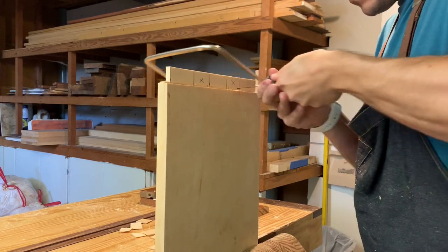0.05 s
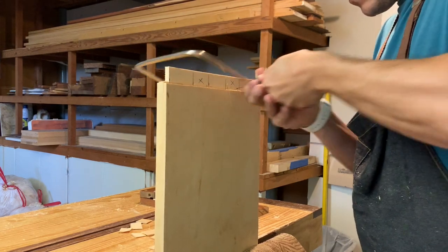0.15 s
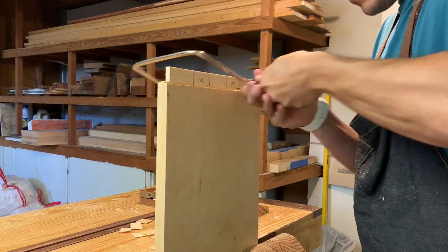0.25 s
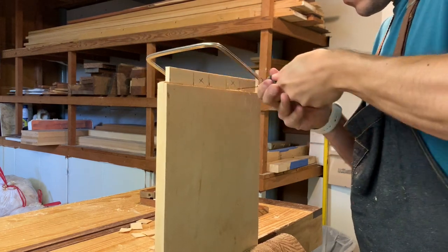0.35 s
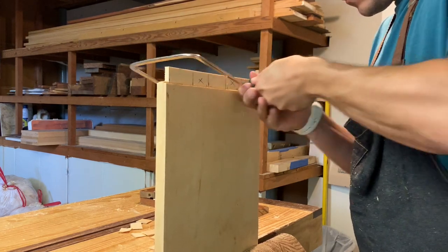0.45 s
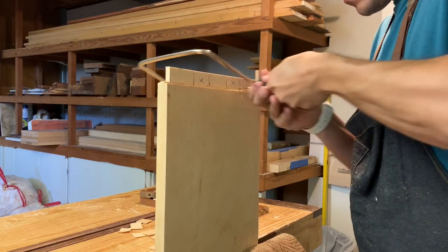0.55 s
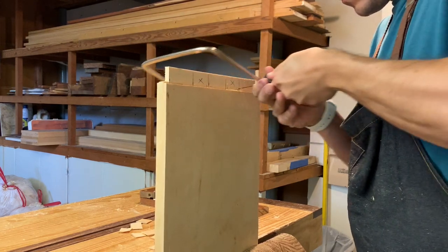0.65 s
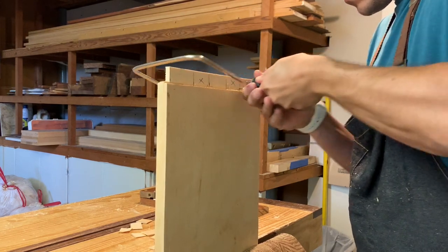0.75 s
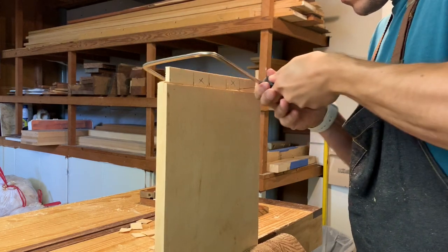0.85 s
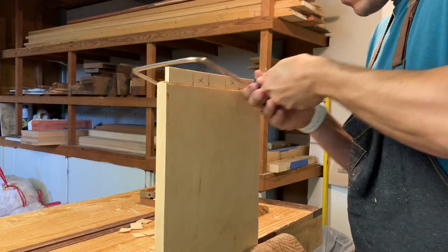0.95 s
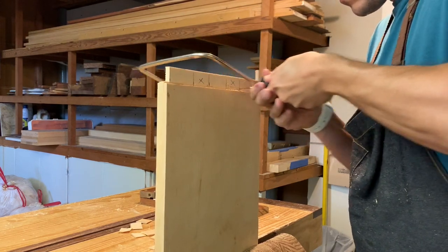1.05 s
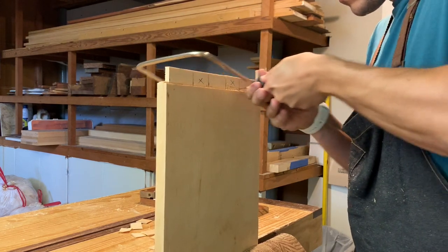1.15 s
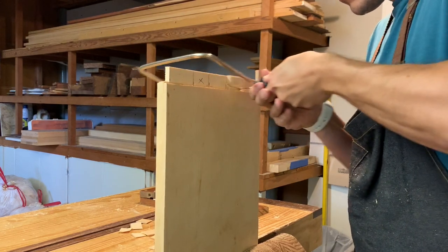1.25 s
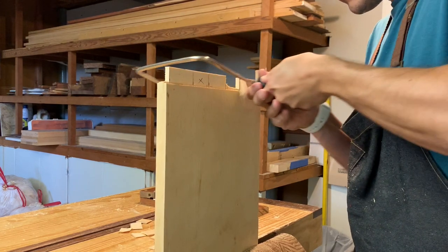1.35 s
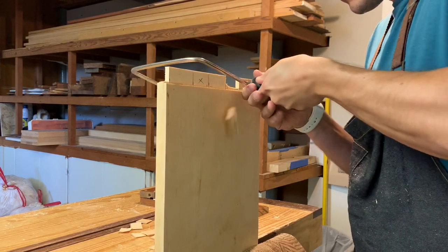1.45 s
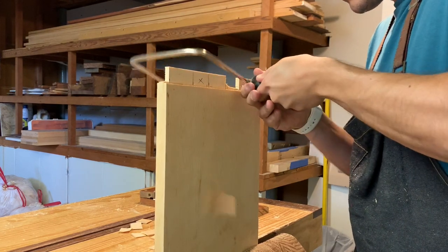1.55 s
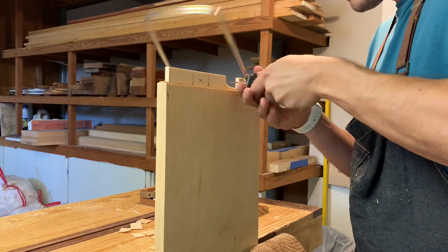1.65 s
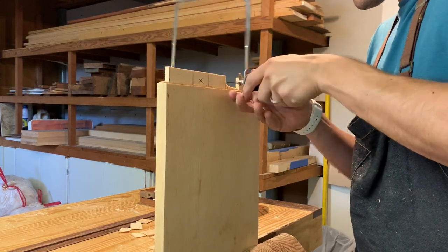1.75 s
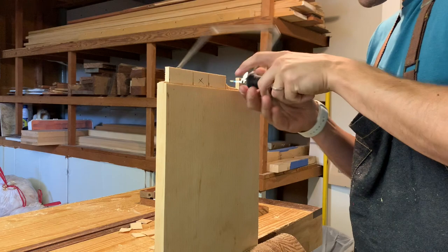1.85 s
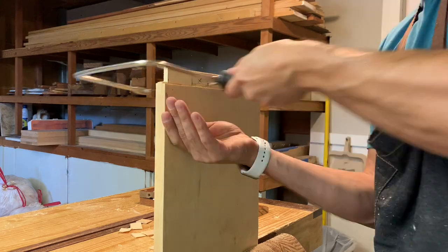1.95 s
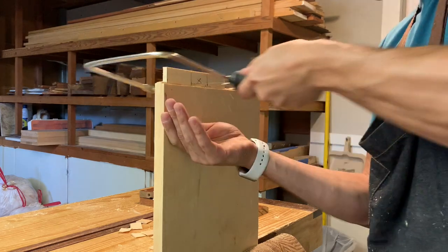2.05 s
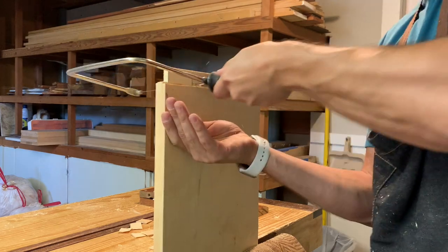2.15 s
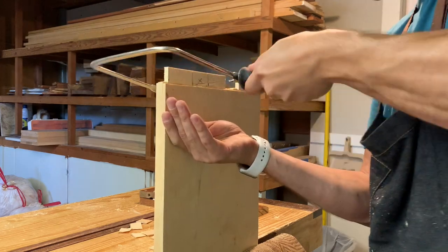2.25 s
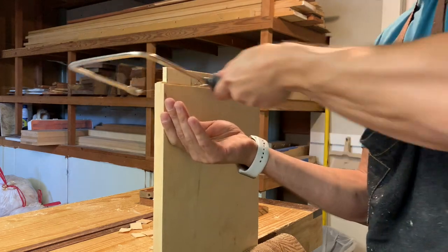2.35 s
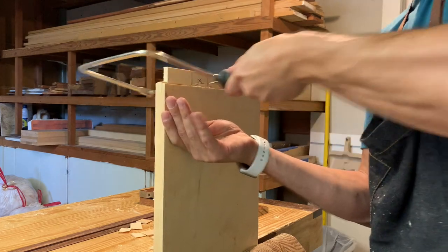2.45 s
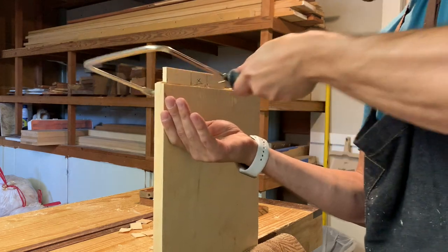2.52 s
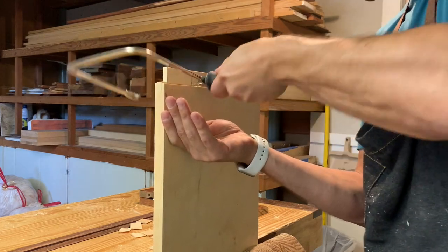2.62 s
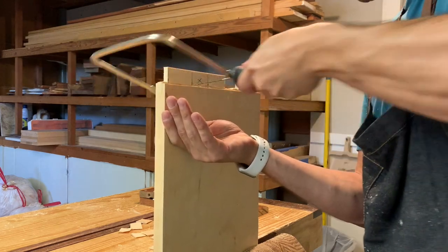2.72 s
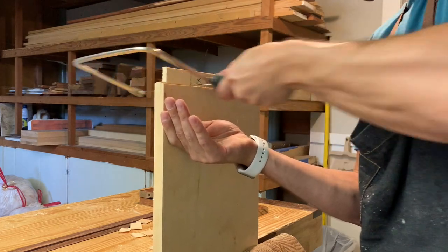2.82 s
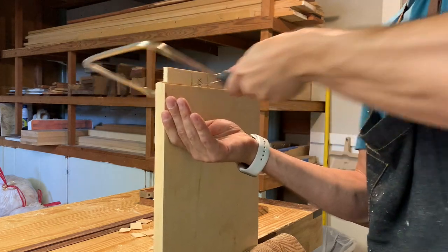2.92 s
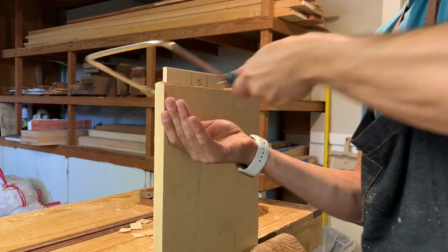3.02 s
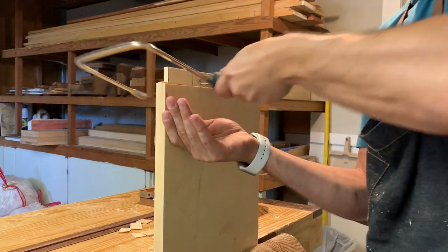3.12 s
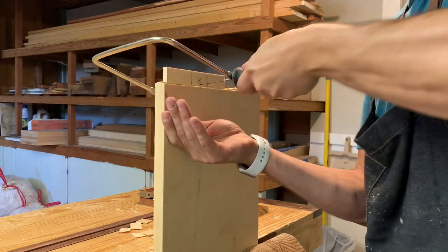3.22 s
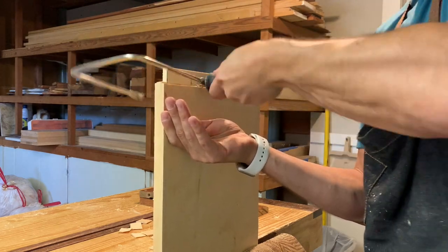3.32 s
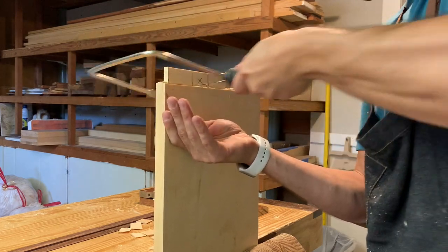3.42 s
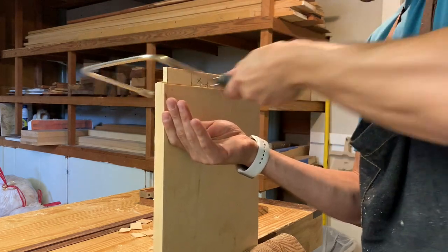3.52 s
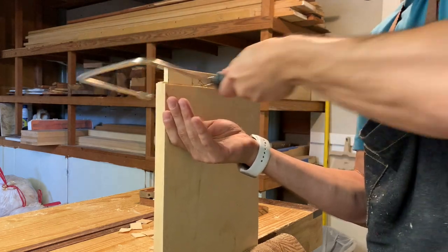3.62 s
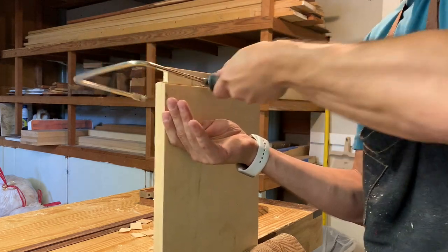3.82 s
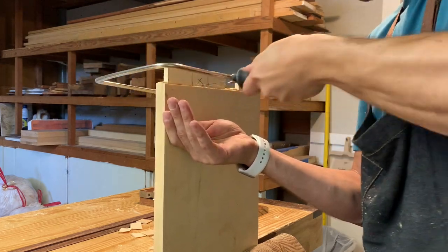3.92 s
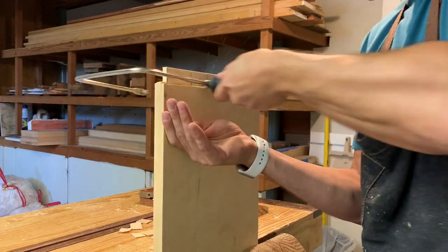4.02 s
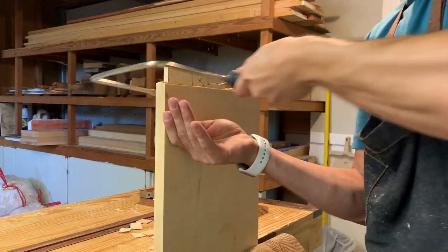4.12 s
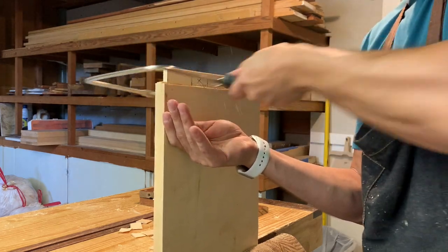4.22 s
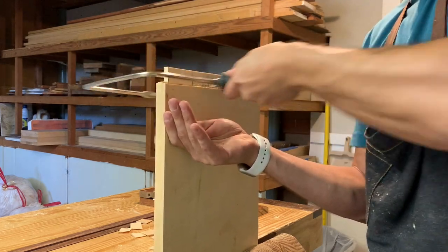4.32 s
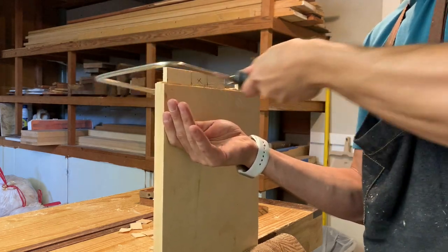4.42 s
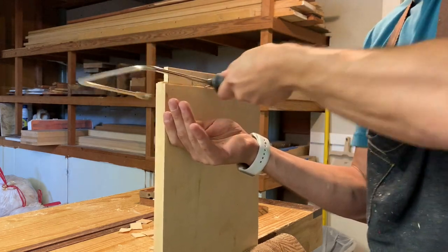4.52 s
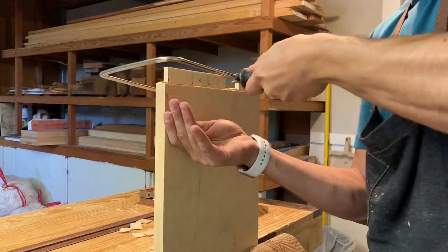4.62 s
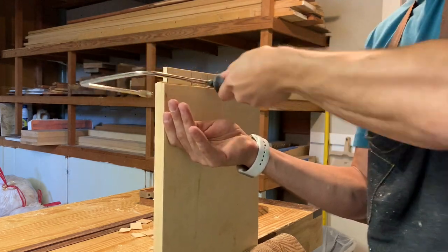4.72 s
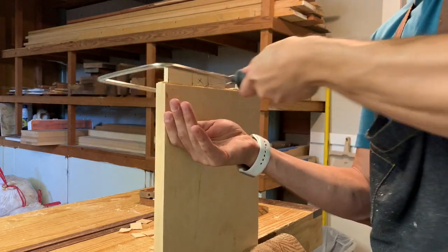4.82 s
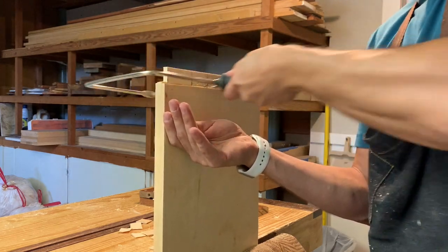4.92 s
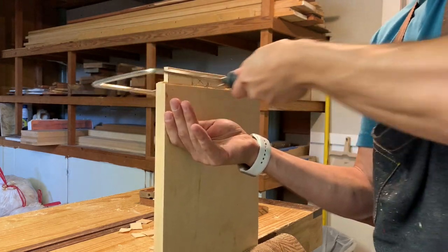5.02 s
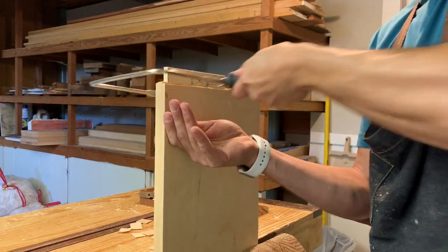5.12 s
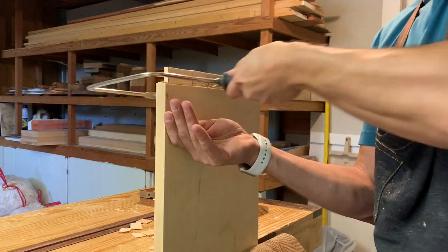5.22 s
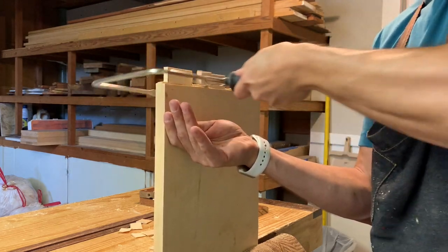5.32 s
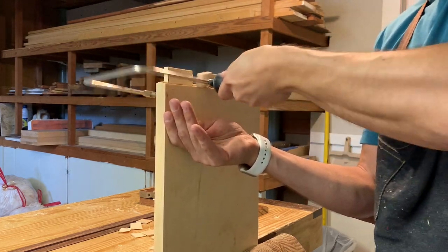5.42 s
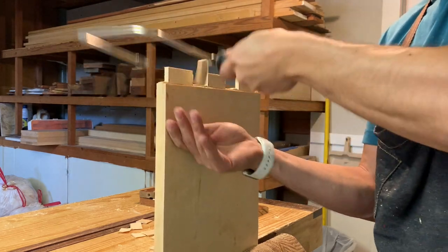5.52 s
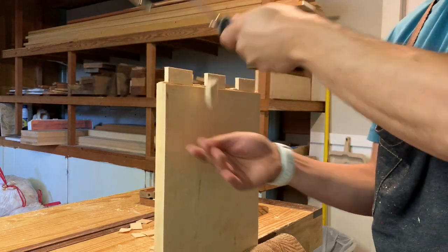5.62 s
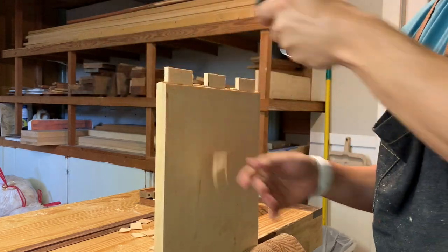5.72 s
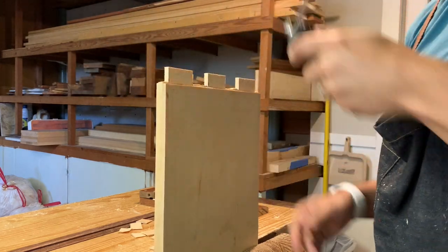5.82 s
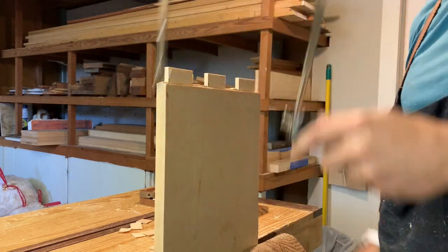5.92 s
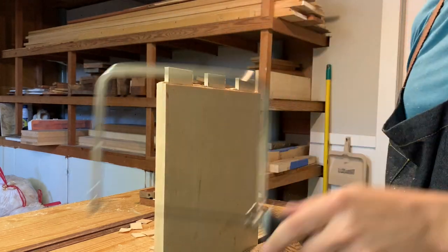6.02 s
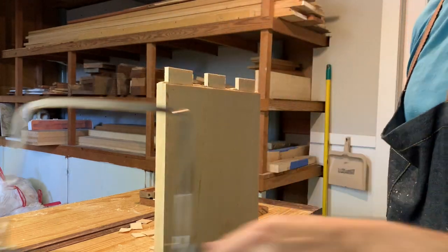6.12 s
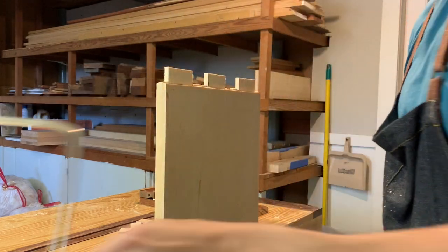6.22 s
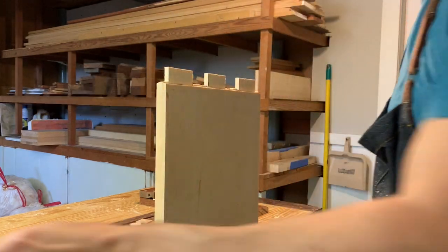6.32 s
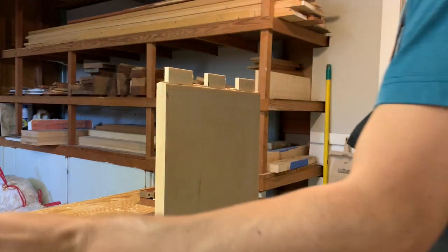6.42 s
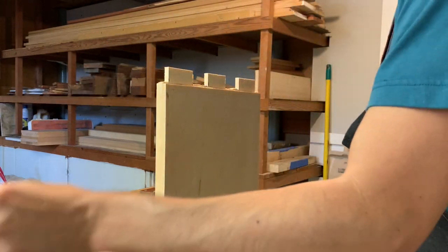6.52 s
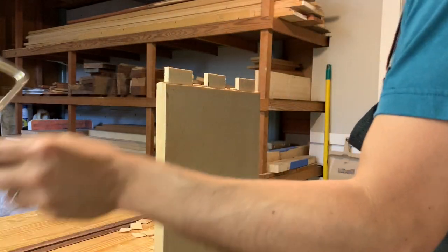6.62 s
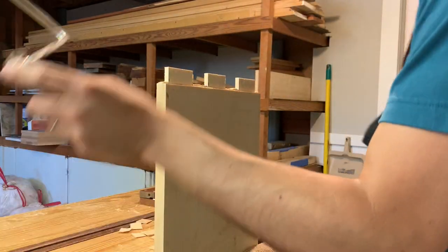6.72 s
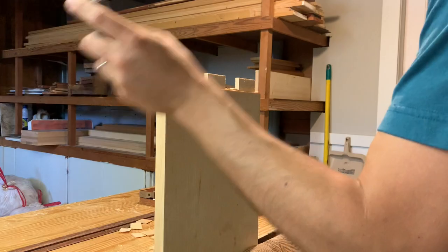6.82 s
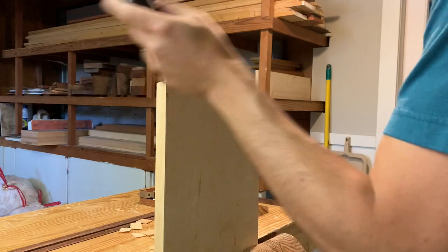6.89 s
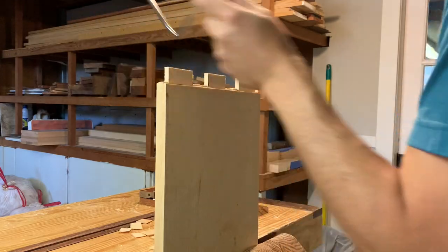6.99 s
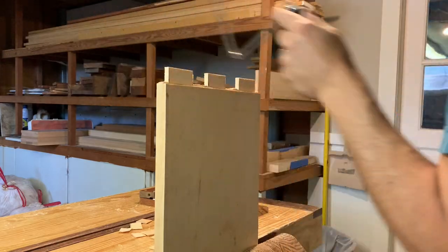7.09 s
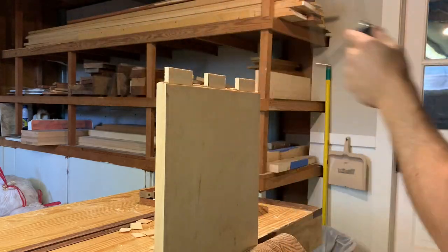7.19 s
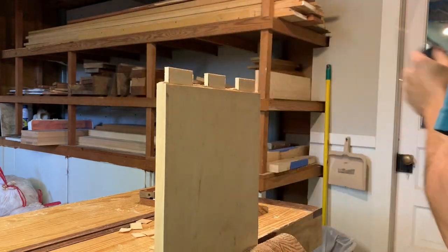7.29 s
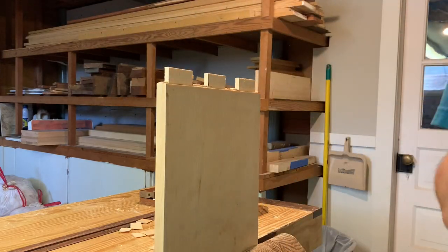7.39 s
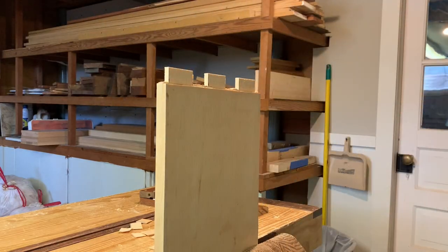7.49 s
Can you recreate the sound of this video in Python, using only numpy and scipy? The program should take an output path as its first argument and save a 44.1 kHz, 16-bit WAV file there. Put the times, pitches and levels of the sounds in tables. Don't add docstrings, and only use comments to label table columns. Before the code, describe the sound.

Close, dry wood sawing in two bursts of fast rasping pushes and lighter returns, ending in an offcut's crack, faint taps and cloth rustle.

```python
import sys
import numpy as np
from scipy import signal
from scipy.fft import rfft, irfft, next_fast_len
from scipy.io import wavfile
from scipy.ndimage import uniform_filter1d

SR = 44100
rng = np.random.default_rng(int(sys.argv[2]) if len(sys.argv) > 2 else 0)


def attenuation_scalar(level_db):
    decades = np.asarray(level_db, float) / 20
    return 10 ** decades


def master(y):
    cut = np.clip(np.atleast_2d(y).T, -1, 1)
    pcm = np.round(cut * 32767)
    wavfile.write(sys.argv[1], SR, pcm.astype(np.int16))


N = 332955
MIDDLE_CUT_S = 1.8


def unit(x):
    return x / np.sqrt(np.mean(np.abs(x) ** 2) + 1e-20)


def along(points, hz):
    f, v = np.transpose(points)
    return np.interp(np.log(hz + 1), np.log(f + 1), v)


def filtered(x, response):
    m = next_fast_len(N + SR // 2)
    spectrum = rfft(x, m) * response(np.fft.rfftfreq(m, 1 / SR))
    return irfft(spectrum, m)[..., :N]


def coloured(x, spectrum):
    return filtered(x, lambda f: unit(attenuation_scalar(along(spectrum, f))))


def ringing(x, modes):
    def response(f):
        total = 0
        for k, (centre, width, db) in enumerate(modes):
            damping = 1j * f * width
            total = total + (-1) ** k * attenuation_scalar(db) * damping / (centre * centre - f * f + damping)
        return unit(total)
    return filtered(x, response)


def board(force, near_corner, near_middle):
    first = np.arange(N) < MIDDLE_CUT_S * SR
    return ringing(force * first, near_corner) + ringing(force * ~first, near_middle)


def crack(t, t60, first_db):
    splinters = attenuation_scalar(-60 * t / t60) * rng.standard_normal(len(t))
    splinters[0] = attenuation_scalar(first_db)
    return splinters


def highpass(x, order, hz):
    return signal.sosfilt(signal.butter(order, hz, 'high', fs=SR, output='sos'), x)


def patchy(x, depth_db):
    z = signal.stft(x, nperseg=512)[2]
    field = uniform_filter1d(rng.standard_normal(z.shape), size=5, axis=0)
    field = uniform_filter1d(field, size=9, axis=1)
    return signal.istft(z * attenuation_scalar(depth_db * unit(field)), nperseg=512)[1][:N]


# start in seconds, push length before the turn in seconds,
# push level in dB, return level in dB, extra weight on the board in dB.
STROKES = [(-0.03, 0.13, -20, -31, -0.5), (0.238, 0.15, -22, -29, -2), (0.5, 0.16, -22.5, -34.5, -1),
           (0.764, 0.17, -22, -38.5, -2), (1.004, 0.11, -25, -34.5, -2.5), (1.217, 0.13, -22.5, -42, -2.5),
           (1.976, 0.057, -22, -28.5, -4.5), (2.146, 0.13, -19.5, -28, 2), (2.404, 0.11, -18, -31.5, -1.5),
           (2.625, 0.13, -19, -28, -0.5), (2.865, 0.12, -18, -28.5, -0.5), (3.103, 0.12, -17, -28.5, 2.5),
           (3.338, 0.13, -18.5, -32, 0), (3.584, 0.12, -20, -32, 0.5), (3.819, .132, -21, -29.5, 0),
           (4.05, 0.13, -20, -29.5, -2.5), (4.285, 0.12, -20, -28.5, -5.5), (4.507, 0.14, -19.5, -29, -3),
           (4.742, 0.1, -20, -29.5, -5), (4.964, 0.11, -23, -32, -1), (5.191, 0.11, -25.5, -35.5, -1.5)]
# push in dB, return in dB.
TEARING = [(3, -6), (-6.5, -6), (-2.5, 0), (-4.5, -3), (-9, -3), (-1.5, -14), (-12, -7), (-3.5, 2),
           (1.5, 11), (12, 7), (3.5, 6), (-0.5, 2), (2.5, 1), (0.5, -0.5), (-3, -2), (-3.5, -2.5), (0, 0.5),
           (1.5, 1), (0.5, -0.5), (-1, -4), (-6, -5.5)]
ENGAGE = [1.2, 1.3, 1.4, 1.1]
RELEASE = [1.1, 1.1, 2.7, 3.2]


def strokes():
    t, out, halves = np.arange(N) / SR, np.zeros((5, N)), []
    next_starts = [row[0] for row in STROKES[1:]] + [N / SR]
    for (s, turn, push_db, return_db, weight_db), (dry_db, back_db), following in zip(STROKES, TEARING, next_starts):
        cut = int(s > MIDDLE_CUT_S)
        push_rasp_db, return_rasp_db = (-22.5, -21.5)[cut], (-22.5, -19)[cut]
        push = np.array([(9.5, 5)[cut] + weight_db, 0, push_rasp_db, push_rasp_db + dry_db])
        back = np.array([(10, 3)[cut], 0, return_rasp_db, return_rasp_db + back_db])
        halves.append((s, 0.39 * turn, turn + 0.022, push_db + push))
        return_s = min(following - s - turn + 0.021, 0.135)
        halves.append((s + turn, (0.027, 0.043)[cut], return_s, return_db + back))
    for start, rise, length, db in halves:
        now = slice(max(round(start * SR), 0), round((start + length) * SR))
        u = t[now] - start
        speed = np.clip(np.sin(np.pi / 2 * np.interp(u, [0, rise, length], [0, 1, 2])), 0, 1)
        power = np.where(u < rise, np.c_[ENGAGE], np.c_[RELEASE])
        out[0, now] = np.maximum(out[0, now], speed)
        out[1:, now] += attenuation_scalar(db)[:, None] * speed ** power
    return out


# time in seconds, freedom in dB.
KERF = [
    [(0, 0), (.25, 3), (.9, -1.5), (1.22, -1.5), (1.5, 3.5)],
    [(1.95, 2.5), (2.2, 2.5), (2.6, -2.5), (3.16, -1.5), (3.7, 0.5), (4.11, 1), (4.57, 0.3), (5.03, 0.5),
     (5.45, 2.9)],
]


def freedom():
    s, free_db = np.transpose(KERF[0] + KERF[1])
    gain_per_db = [0.4, 1, 3.9]
    return attenuation_scalar(np.outer(gain_per_db, np.interp(np.arange(N) / SR, s, free_db)))


def teeth(speed, top_hz, scatter, size_db):
    rate = top_hz * np.clip(speed, .12, 1)
    at = np.flatnonzero(np.diff(np.floor(np.cumsum(rate) / SR)))
    chance = rng.standard_normal((N // 20, 2))[:len(at)]
    late = np.clip(at + scatter * chance[:, 0] * SR / rate[at], 0, N - 1).astype(int)
    return unit(np.bincount(late, attenuation_scalar(size_db * chance[:, 1]) / np.sqrt(rate[at]), N))


# time in seconds, peak in dB, thud in dB.
SNAGS = [(0.0412, -23.5, 6), (0.292, -29, -12), (0.3266, -13, -2.5), (0.5227, -23.5, 3), (0.5646, -11, -4),
         (0.795, -20.5, -6.5), (0.801, -23, 4.5), (0.575, -24.5, 3), (0.615, -21, 2.5),
         (0.841, -23.5, -3.5), (1.035, -35.5, -13), (1.056, -28.5, 6), (0.338, -19.5, -2),
         (0.57, -16, -2.5), (2.1823, -16.5, 2), (2.6423, -33.5, 3.5), (2.6574, -20.5, 5),
         (3.2872, -29.5, 3.5), (3.8396, -26.5, -2.5), (4.0683, -22.5, 1), (4.5269, -31, 3.5),
         (5.2062, -45, -2), (0.832, -11, -3.5), (0.8787, -21, 4.5), (1.0253, -26, -4), (1.12, -24, 2.5),
         (1.2447, -23, 1), (1.2688, -9, 0), (1.9842, -31, 17), (2.1648, -26.5, -8), (2.411, -29.5, 12.5),
         (2.435, -9, 1.5), (2.441, -19, -3.5), (2.8859, -36, -10.5), (3.123, -26, -0.5), (3.147, -27.5, 8),
         (3.3586, -20, -7.5), (3.6042, -28.5, -2), (3.637, -21, 1.5), (3.8597, -22, 0), (4.302, -26.5, 2),
         (4.983, -25, 0.5), (2.905, -26.5, 1.5)]
# centre in Hz, width in Hz, level in dB.
THUD_1 = [(198.3, 12, 7), (255, 51, -2.5), (330, 100, -3.5), (392, 35, 0.5), (424, 27, -3)]
THUD_2 = [(187, 17, -7), (307.6, 28.5, -6.5), (404, 22, -1), (475, 27, -9.5)]
RING_1 = [(557.7, 22, 2), (585, 140, -1.5), (733, 14, -4), (844, 91, -7.5), (990, 36, -5), (1116, 76, -10)]
RING_2 = [(581, 31, 3), (648, 54, -1), (731, 64, -5.5), (872, 120, -8), (974.4, 32, -1), (1084, 260, -14.5)]
BITE_1 = [(2620, 260, 1), (3640, 100, -0.5)]
BITE_2 = [(2566, 350, 4.5), (4330, 1000, -5.5)]
# centre in Hz, width in Hz, level in dB.
BITE_LOW = [(1334, 160, -1.2), (1643, 140, -1.5), (1973, 298, -0.29), (2095, 226, 0.42)]
# centre in Hz, width in Hz, level in dB.
CLICK = [(1330, 330, 3.5), (2080, 240, 4), (2650, 190, -4), (3300, 400, -17.5)]
# centre in Hz, width in Hz, level in dB.
BENCH_1 = [(72, 6.3, 2.5), (126, 27.4, -8.5)]
BENCH_2 = [(62, 9.4, -4.5), (132, 27, 3.5)]
# frequency in Hz, level in dB per Hz.
RASP = [(3000, -17.5), (4500, 2.5), (5600, 1), (7000, 2), (8500, -1), (10000, -16)]
FINE = [(8500, -40.5), (10000, 10), (12000, 5.5), (14500, -7), (16000, -24.5)]


def saw():
    speed, thud, ring, rasp, dry = strokes()
    low, high, fine = freedom()
    blows = teeth(speed, top_hz=900, scatter=.45, size_db=3.0)
    blows -= uniform_filter1d(blows, size=1500)
    tear = np.exp(-np.arange(200) / SR / 0.0002)
    gate = unit(signal.fftconvolve(np.abs(blows), tear)[:N])
    fibres = unit((2.5 + 0.5 * gate) * rng.standard_normal(N))

    snag, knock, t = np.zeros(N), np.zeros(N), np.arange(500) / SR
    for s, db, thud_db in SNAGS:
        at = round(s * SR)
        snag[at:][:len(t)] += attenuation_scalar(db + 7.0) * crack(t, 0.0078, first_db=10.0)
        knock[at] = attenuation_scalar(db + thud_db + 22.0)

    wood = board(0.52 * thud * blows + knock, THUD_1, THUD_2)
    wood += board(0.81 * ring * blows + 0.63 * knock, RING_1, RING_2)
    wood = highpass(wood, 3, 170)

    scrape = rasp * unit(blows + 1.8 * fibres)
    bite = ringing(attenuation_scalar(11.5) * low * scrape, BITE_LOW)
    bite += board(attenuation_scalar(5.0) * high * scrape, BITE_1, BITE_2)
    bite += tongue(high * scrape)

    click = attenuation_scalar(-2.5) * ringing(snag, CLICK)
    click = signal.sosfilt(signal.butter(4, 3700, fs=SR, output='sos'), click)
    hiss = coloured(rasp * fibres + 0.017 * snag, RASP)
    hiss += attenuation_scalar(-4.5) * coloured(fine * dry * fibres + .006 * snag, FINE)

    shake = board(thud * blows + 0.39 * knock, BENCH_1, BENCH_2)
    shake *= attenuation_scalar(np.where(np.arange(N) < MIDDLE_CUT_S * SR, -20.5, -27))
    grainy = patchy(wood, depth_db=2.0) + patchy(bite, depth_db=1.88) + patchy(hiss, depth_db=2.6)
    return grainy + chatter() + click + shake


# time in seconds, resonance in Hz.
TONGUE = [(1.95, 3600), (2.4, 3300), (3.0, 3000), (3.8, 3060), (4.3, 2730), (4.7, 2270), (5.4, 2213)]


def tongue(x):
    hz, t, z = signal.stft(x * (np.arange(N) > MIDDLE_CUT_S * SR), SR, nperseg=512)
    off = hz[:, None] - np.interp(t, *np.transpose(TONGUE))
    skirt_hz = np.where(off < 0, 530, 160)
    gain = 1 / (1 + (off / skirt_hz) ** 2)
    return attenuation_scalar(-3.5) * signal.istft(z * gain, SR, nperseg=512)[1][:N] / np.sqrt(np.mean(gain ** 2))


# loudest time in seconds, frequency in Hz, level in dB, length in seconds.
LOW_LOCKS = [(0.064, 387, -23.5, 0.056), (0.068, 203, -25.5, 0.045), (0.309, 236, -25.5, 0.082),
             (0.351, 288, -16, 0.019), (0.584, 287, -17, 0.025), (0.623, 418, -24.5, 0.029),
             (0.627, 215, -29, 0.026), (0.845, 244, -13, 0.016), (0.863, 445, -29.5, 0.076),
             (0.892, 252, -22, 0.022), (0.902, 446, -28.5, 0.044), (1.068, 206, -26.5, 0.014),
             (1.071, 308, -28, 0.023), (1.1, 224, -31, 0.026), (1.276, 249, -20, 0.043),
             (1.289, 405.3, -21.5, 0.071), (1.316, 404, -22.5, 0.098), (1.992, 302.5, -20, 0.016),
             (1.995, 404, -12.5, 0.024), (2.181, 310, -20.5, 0.013), (2.221, 418, -13.5, 0.074),
             (2.447, 402, -21, 0.033), (2.45, 305, -22.5, 0.026), (2.668, 314, -15, 0.027),
             (2.687, 404, -19, 0.058), (2.713, 409.7, -17.5, 0.067), (2.916, 404, -17, 0.042),
             (2.945, 404, -18.5, 0.056), (3.155, 424, -13, 0.021), (3.159, 330.9, -15.5, 0.023),
             (3.179, 329, -30, 0.095), (3.406, 299, -15.5, 0.013), (3.518, 404, -22.5, 0.021),
             (3.428, 399.6, -9.5, 0.044), (3.668, 408, -11, 0.077), (3.901, 405.4, -12.5, 0.04),
             (3.903, 316, -18.5, 0.019), (4.122, 425, -17.5, 0.044), (4.169, 406.4, -24.5, 0.13),
             (4.366, 404.7, -14.5, 0.055), (4.376, 296, -24, 0.022), (4.557, 303, -32.5, 0.1),
             (4.586, 452, -22.5, 0.043), (4.597, 298, -20.5, 0.02), (4.826, 297, -21, 0.022),
             (4.898, 408, -20.5, 0.027), (5.017, 298, -31, 0.067), (5.022, 404, -20, 0.089),
             (4.95, 404, -25.5, 0.031)]
MIDDLE_LOCKS = [(0.046, 592, -17, 0.014), (0.307, 685.5, -28, 0.083), (0.365, 634, -23.5, 0.034),
                (0.581, 652, -19, 0.021), (0.619, 605, -23, 0.042), (0.886, 599, -21, 0.016),
                (1.289, 623, -22.5, 0.071), (1.997, 760, -26, 0.02), (2.003, 589.5, -15, 0.028),
                (2.183, 571.7, -31.5, 0.062), (2.193, 714, -26.5, 0.081), (2.446, 670.6, -16, 0.018),
                (2.486, 634, -26, 0.038), (2.68, 689, -21.5, 0.028), (2.684, 636.3, -29, 0.12),
                (2.718, 621.3, -23, 0.09), (2.76, 620.6, -29.5, 0.055), (2.913, 540, -30, 0.032),
                (2.935, 699, -26.5, 0.044), (2.961, 511, -24.5, 0.056), (2.963, 595.5, -29, 0.029),
                (3.141, 610, -27.5, 0.019), (3.153, 716.4, -24, 0.044), (3.175, 585, -34, 0.041),
                (3.41, 581, -19.5, 0.018), (3.416, 736, -24.5, 0.06), (3.446, 586, -29, 0.063),
                (3.485, 610, -27, 0.024), (3.654, 577, -19, 0.022), (3.901, 718, -20.5, 0.032),
                (3.929, 630, -15, 0.03), (4.131, 625, -21.5, 0.084), (4.322, 592, -28.5, 0.09),
                (4.378, 600, -17, 0.054), (4.596, 640, -27, 0.025), (4.61, 574, -30, 0.076),
                (4.777, 593, -29, 0.032), (4.835, 603.6, -18.5, 0.042), (4.869, 608.6, -26.5, 0.12),
                (5.039, 630, -26, 0.063), (5.256, 588, -31.5, 0.046)]
HIGH_LOCKS = [(0.357, 964, -33.5, 0.057), (0.369, 864, -27, 0.048), (0.579, 868, -22.5, 0.038),
              (0.595, 985, -25.5, 0.038), (0.623, 823, -33.5, 0.072), (0.836, 882, -22, 0.026),
              (0.886, 882, -27, 0.035), (1.275, 884, -27.5, 0.039), (2.003, 971, -27, 0.028),
              (2.083, 950, -26.5, 0.038), (2.205, 996, -12.5, 0.034), (2.223, 859, -29.5, 0.038),
              (2.436, 867, -25, 0.026), (2.45, 978, -26, 0.033), (2.702, 960, -16.5, 0.018),
              (2.911, 950, -17, 0.016), (3.159, 980, -19.5, 0.025), (3.173, 862, -29.5, 0.05),
              (3.291, 963, -22, 0.028), (3.406, 837, -23.5, 0.02), (3.422, 926, -23.5, 0.022),
              (3.648, 953, -20.5, 0.029), (3.652, 872, -22, 0.044), (3.895, 838, -21, 0.034),
              (4.119, 883, -27, 0.046), (4.141, 972, -26, 0.072), (4.352, 991, -28, 0.099),
              (4.36, 864, -20, 0.022), (4.566, 956, -16, 0.026), (4.578, 833, -28, 0.03),
              (4.785, 981, -23.5, 0.061), (5.041, 937, -29.5, 0.03), (5.262, 954, -32.5, 0.03)]
# loudest time in seconds, frequency in Hz, level in dB.
SQUEALS = [(0.03, 1305, -16), (0.034, 2600, -23), (0.275, 1356, -20), (0.3, 2630, -29), (0.335, 2296, -22),
           (0.577, 1392, -16.5), (0.59, 2070, -23), (0.842, 1964, -17.5), (1.272, 1990, -26),
           (2.184, 1620, -17.5), (2.192, 2080, -20.5), (2.196, 2620, -18), (2.445, 2650, -29.5),
           (2.451, 2080, -23), (2.459, 1301, -24), (2.672, 2054, -14.5), (2.686, 1684, -21),
           (2.912, 2620, -25.5), (2.915, 1655, -13.5), (3.152, 1530, -27.5), (3.41, 1980, -21.5),
           (3.637, 2040, -19.5), (3.88, 1960, -19.5), (4.11, 2080, -17.5), (4.35, 1925, -17.5),
           (4.572, 1938, -15), (4.1, 1330, -23.5), (4.8, 2095, -24.5), (4.826, 1954, -27),
           (5.022, 1520, -21), (5.24, 2030, -30)]


def locks():
    rows = []
    for table, gain_db in ((LOW_LOCKS, 3), (MIDDLE_LOCKS, 2), (HIGH_LOCKS, 3)):
        for s, hz, db, length in table:
            rows.append((s, hz, db + gain_db, 1.353 * length))
    return rows + [(s, hz, db - 10.0, 0.067) for s, hz, db in SQUEALS]


def chatter():
    out, u = np.zeros(N), np.arange(-SR // 10, SR // 5) / SR
    for s, hz, db, length in locks():
        grip = uniform_filter1d(rng.standard_normal(len(u)), size=200)
        rough = np.clip(hz / 800, 1, 3.3)
        drift = np.cumsum(grip) * 0.022 * rough ** 2.3
        shape = np.exp(-.5 * (u / (length * np.where(u < 0, .22, .33))) ** 2)
        level = attenuation_scalar(db + 0.69 * rough * unit(grip)) * shape
        tone = level * np.sin(2 * np.pi * hz * u + drift + 6 * rng.random())
        at = round(s * SR) - SR // 10
        out[max(at, 0):at + len(u)] += tone[max(-at, 0):]
    return out


# time in seconds, crack in dB,
# crack t60 in seconds, ring in Hz, ring level in dB.
TAPS = [(1.724, -57.5, 0.035, 2340, -68.5), (1.845, -56, 0.0095, 2951, -48), (1.856, -70, .02, 900, -44.5),
        (1.8644, -48.5, 0.022, 2357, -36), (1.8951, -23.5, 0.016, 3960, -26.5),
        (1.903, -25.5, 0.029, 7500, -45), (1.947, -62.5, 0.023, 3980, -39.5),
        (6.0588, -53, 0.05, 4200, -48), (6.0699, -12, 0.00072, 4050, -43.5),
        (6.0755, -21.5, 0.00097, 3300, -41.5), (6.071, -28.5, 0.053, 9850, -29.5),
        (6.457, -42, 0.0085, 6275, -49.5), (6.462, -40, 0.06, 3934, -44.5), (6.47, -46.5, 0.052, 7420, -50),
        (6.487, -65, 0.021, 3900, -48), (6.528, -42.5, 0.013, 7300, -59), (6.632, -66, 0.019, 3930, -53.5),
        (6.675, -64, 0.019, 1001, -59)]
# frequency in Hz, t60 in seconds.
TAP_RING_T60_S = [(900, 0.14), (2700, 0.077), (4000, 0.06), (6000, .04), (7400, 0.2)]
# frequency in Hz, level in dB per Hz.
CRACK = [(240, -25.5), (600, -17), (1400, -8), (2400, -3), (4500, -3.5), (7000, -3), (10000, 0),
         (13500, -15.5), (16000, -21)]
HARD_CRACK = [(400, -17.5), (1200, -6.5), (2400, -3.5), (4000, 4), (7000, 6.5), (10000, 7), (14500, -15),
              (16200, -10)]


def taps():
    out, cracks, t = np.zeros(N + SR), np.zeros((2, N + SR)), np.arange(SR // 3) / SR
    for s, db, crack_t60, hz, ring_db in TAPS:
        at = round(s * SR)
        waver = 0.068 * np.cumsum(rng.standard_normal(len(t)))
        decay = attenuation_scalar(ring_db - 60 * t / along(TAP_RING_T60_S, hz))
        out[at:][:len(t)] += decay * np.sin(2 * np.pi * hz * t + waver)
        floor = int(6 < s < 6.2)
        cracks[floor, at:][:len(t)] += attenuation_scalar(db + 2.0) * crack(t, crack_t60, first_db=7.0)
    return out[:N] + coloured(cracks[0, :N], CRACK) + coloured(cracks[1, :N], HARD_CRACK)


# time in seconds, level in dB.
SPLITS = [
    (1.235, -56.5),
    (1.2463, -40.5),
    (1.2609, -28.5),
    (1.302, -35.5),
    (1.7515, -60),
    (2.411, -33),
    (2.434, -27.5),
]
# frequency in Hz, level in dB per Hz.
SPLIT = [(3000, -29), (7000, -1.5), (11000, 2), (14500, 1.5), (16000, -5.5)]


def splits():
    out, t = np.zeros(N), np.arange(400) / SR
    for s, db in SPLITS:
        out[round(s * SR):][:len(t)] += attenuation_scalar(db + 1.5) * crack(t, 0.006, first_db=-2.0)
    return coloured(out, SPLIT)


def swells(rows):
    t, total = np.arange(N) / SR, 0
    for s, rise, fall, *db in rows:
        bell_db = -20 * ((t - s) / np.where(t < s, rise, fall)) ** 2
        total = total + attenuation_scalar(np.array(db)[:, None] + bell_db)
    return total


# loudest time in seconds, rise in seconds, fall in seconds, level in dB.
RUSTLE = [
    (5.95, 0.02, 0.11, -67),
    (6.67, 0.072, 0.11, -69),
    (7.076, 0.029, 0.0487, -77),
    (7.184, 0.024, 0.088, -75),
    (7.35, 0.044, 0.04, -56.5),
    (7.38, 0.12, 0.2, -61),
]
# loudest time in seconds, rise in seconds, fall in seconds,
# low rub in dB, upper rub in dB.
HANDS = [
    (1.72, .09, 0.31, -56, -53),
    (5.5, 0.15, 0.54, -57, -66.5),
    (6.068, 0.0085, 0.023, -73.5, -47.5),
    (6.468, 0.01, 0.09, -80, -61.5),
    (6.68, 0.037, 0.052, -87, -64),
    (7.368, 0.085, 0.11, -77.5, -56.5),
]
# frequency in Hz, level in dB per Hz.
CLOTH = [(300, -5), (700, -11), (2000, -3), (6000, -3), (10000, -1), (16000, -6)]
RUB_LOW = [(130, -28.5), (190, 24.5), (270, 20), (450, -31)]
RUB_UP = [(300, -4), (500, 4.5), (900, -5), (1600, -10), (3000, -29.5)]


def cloth():
    clumps = attenuation_scalar(3.4 * unit(uniform_filter1d(rng.standard_normal(N), size=60)))
    grains = unit(clumps * rng.standard_normal(N))
    low, upper = swells(HANDS)
    hands = attenuation_scalar(3.0) * coloured(low * rng.standard_normal(N), RUB_LOW)
    hands += attenuation_scalar(-3.5) * coloured(upper * grains, RUB_UP)
    return attenuation_scalar(5.0) * coloured(swells(RUSTLE)[0] * grains, CLOTH) + hands


def nearby(x):
    copies = np.zeros(600)
    copies[rng.integers(40, 530, size=16)] = 0.25 * rng.standard_normal(16)
    treble = highpass(x, 2, 560)
    return np.array([x, 0.5 * (x + signal.fftconvolve(treble, copies)[:N])])


# frequency in Hz, level in dB.
WALLS = [(100, -3), (450, -6), (1000, -0.5), (4000, 3), (15000, -6)]
# frequency in Hz, t60 in seconds.
SHOP = [(100, 0.56), (250, 0.61), (1000, 0.5), (3000, 0.35), (8000, 0.34), (15000, 0.3)]


def shop(x):
    x = filtered(x, lambda f: attenuation_scalar(along(WALLS, f)))
    out, step = np.zeros((2, N + SR)), SR // 3
    for at in range(0, N, step):
        hz, t, z = signal.stft(rng.standard_normal((2, SR // 2)), SR, nperseg=256)
        decay = attenuation_scalar(-60 * t / along(SHOP, hz)[:, None])
        tail = signal.istft(z * decay, SR, nperseg=256)[1]
        wet = signal.fftconvolve(x[None, at:at + step], tail / np.linalg.norm(tail[0]), axes=1)
        out[:, at + 250:at + 250 + wet.shape[1]] += wet
    return out[:, :N]


# frequency in Hz, level in dB per Hz.
HUM = [(15, -42), (30, -22), (60, -1.5), (90, -1.5), (150, -10.5), (293, -14), (769, -21.5), (5420, -39),
       (8550, -60.5), (16000, -80)]
# centre in Hz, width in Hz, level in dB.
MAINS = (130, 3.3, -64.5)


def hum():
    air = attenuation_scalar(-62.0) * coloured(rng.standard_normal((2, N)), HUM)
    return air + attenuation_scalar(MAINS[2]) * ringing(rng.standard_normal((2, N)), [MAINS])


def scene():
    near, far = saw(), taps() + cloth() + splits()
    echo = shop(attenuation_scalar(-8.5) * near + attenuation_scalar(-4.5) * far)
    return nearby(attenuation_scalar(-2.0) * near + far) + echo + hum()


def top_cut(x):
    return signal.sosfilt(signal.butter(12, 16480, fs=SR, output="sos"), x)


# frequency in Hz, ratio in dB.
PORTS = [(60, -12), (200, -11), (400, -5), (800, 0), (2400, 0.5), (5600, 2.5), (7000, -1.5), (8500, 7.5),
         (9200, 17.5), (9900, 22), (10600, 11), (11300, 4), (13300, -8), (14700, -0.5), (16000, 9.5)]
# frequency in Hz, level in dB.
TOP = [(15000, 0), (15600, -8), (16100, -70)]


def record(dry):
    def response(f):
        turn = np.arctan(attenuation_scalar(along(PORTS, f)))
        return attenuation_scalar(along(TOP, f)) * np.array([np.cos(turn), -1j * np.sin(turn)])
    mid, side = filtered(dry, response)
    ports = np.array([mid + side, mid - side])
    ports = ports / (1 + np.abs(ports / .68) ** 5) ** (1 / 5)
    return top_cut(ports)


dry = scene()
out = record(dry)
master(out)
```